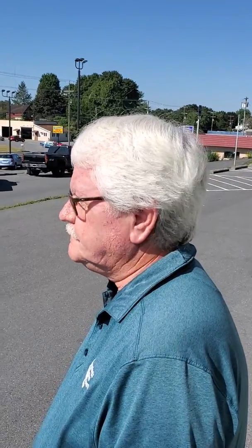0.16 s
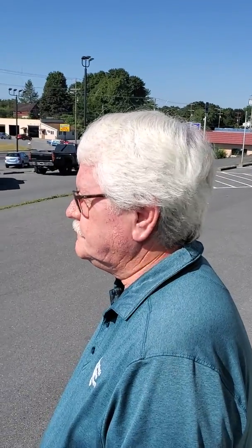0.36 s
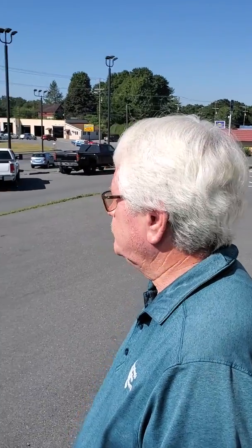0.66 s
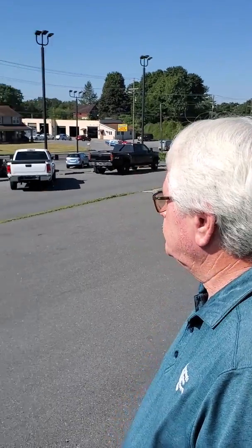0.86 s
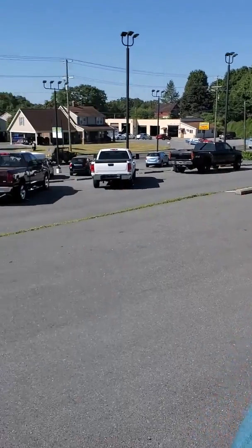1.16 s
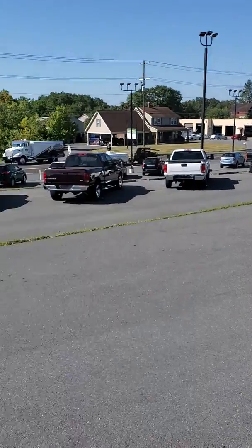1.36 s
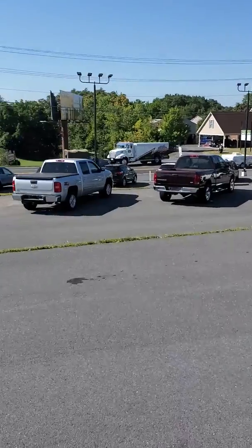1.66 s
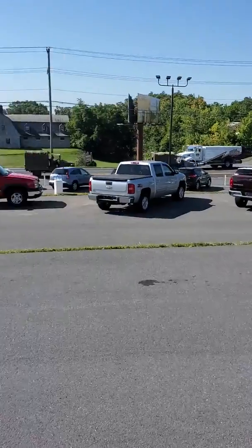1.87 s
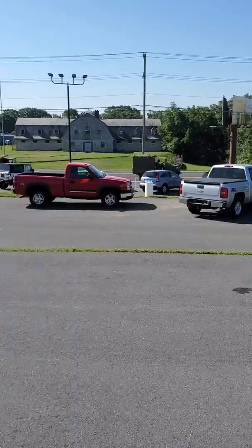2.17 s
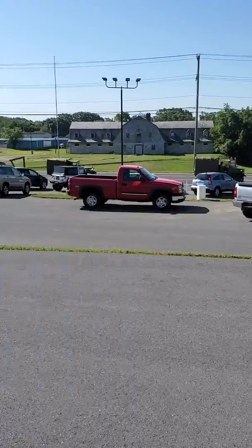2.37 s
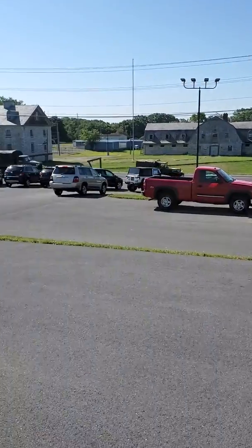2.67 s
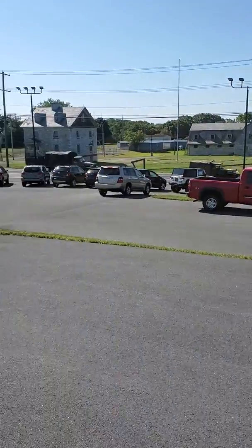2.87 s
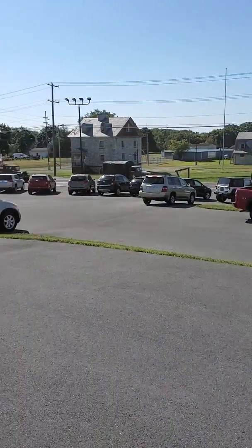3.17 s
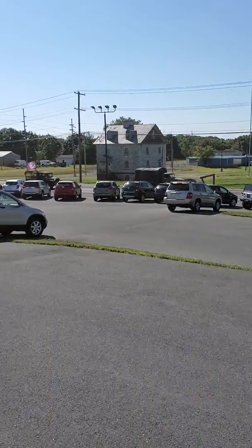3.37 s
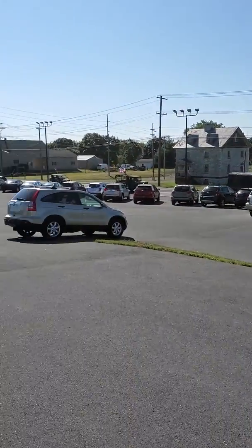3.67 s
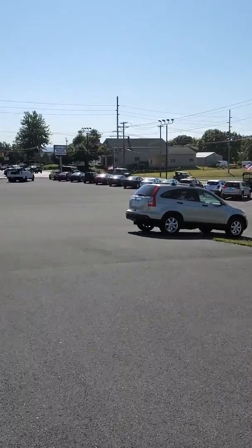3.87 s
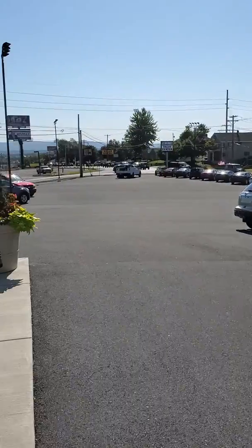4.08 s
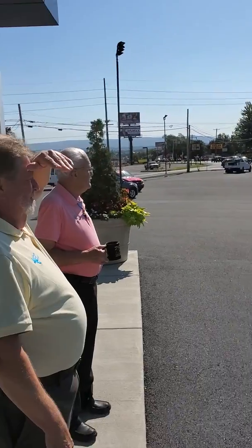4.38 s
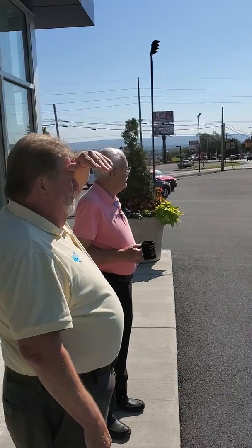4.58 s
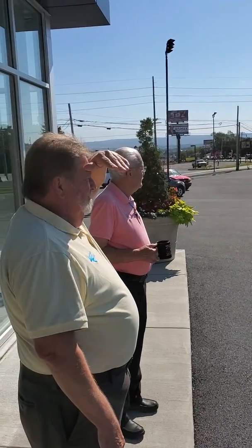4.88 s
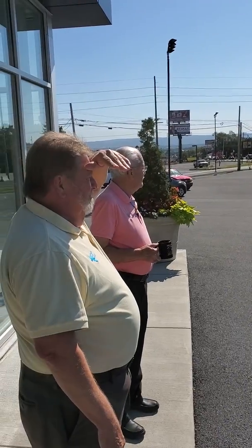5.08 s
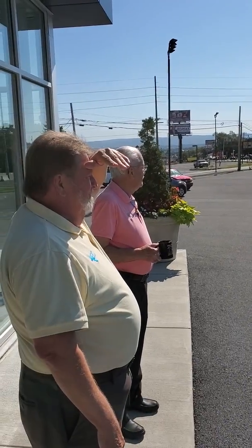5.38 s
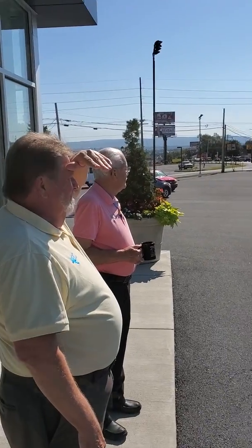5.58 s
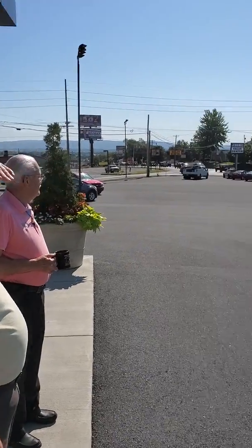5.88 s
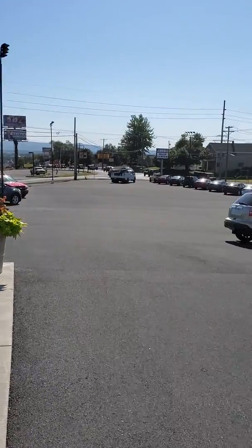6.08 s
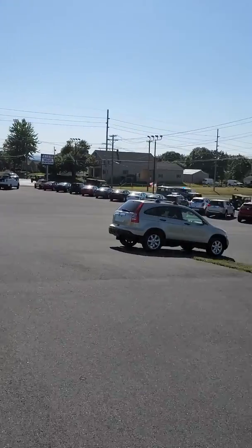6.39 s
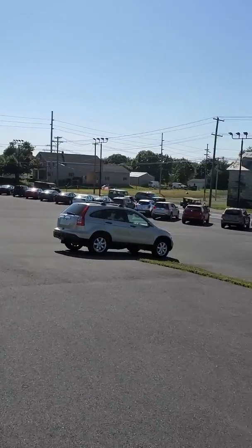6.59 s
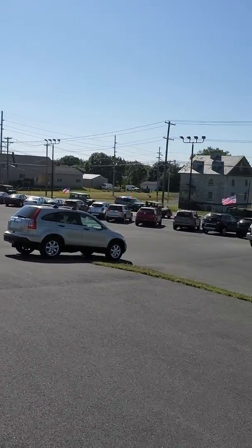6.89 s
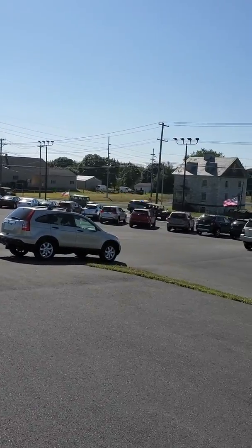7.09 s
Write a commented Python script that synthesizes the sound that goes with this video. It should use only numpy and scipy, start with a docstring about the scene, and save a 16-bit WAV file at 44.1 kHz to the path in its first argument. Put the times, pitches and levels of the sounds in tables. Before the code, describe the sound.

Deep truck exhausts climb in pitch on a nearby road, with one brief air brake hiss and light wind on the microphone.

```python
"""Deep, beating exhaust notes climb as heavy trucks pull up a road beyond a wide car park.
Each exhaust sings its firing note, rising with the revs, over a bed of rumble and tyre roar.
Fans hiss, turbos whistle, loose metal clanks, and one truck vents its air brakes.
It is all heard outdoors through two small microphone ports, with light wind puffing on them."""
import sys
import numpy as np
from scipy import signal
from scipy.io import wavfile
from scipy.ndimage import map_coordinates

SR = 44100
rng = np.random.default_rng(int(sys.argv[2]) if len(sys.argv) > 2 else 0)


def unload_audio(sound):
    """Save the sound as a 16-bit wav file, at the path given as the first command line argument."""
    columns = np.transpose(np.atleast_2d(sound))
    # keep every value between -1 and 1, then stretch to whole-number steps
    steps = np.round(np.clip(columns, -1, 1) * 32767)
    wavfile.write(sys.argv[1], SR, steps.astype(np.int16))


N = 319284
T = np.arange(N) / SR

# Fader rides for the traffic's noise beds: time_s, lows_db, tyres_db, air_db, top_db
TRAFFIC_LEVELS = [(0.0, -40.5, -44.5, -54.5, -65), (0.25, -38.5, -44.5, -57, -72),
                  (0.75, -37.5, -40, -54.5, -60.5), (1.2, -37.5, -43, -55, -58.5),
                  (1.55, -41, -45, -55.5, -62.5), (2.0, -41.5, -46.5, -53.5, -68.5),
                  (2.3, -44, -49, -60, -68.5), (2.75, -40.5, -47.5, -57, -60),
                  (3.0, -42, -45.5, -54.5, -62.5), (3.5, -44, -48, -59.5, -67.5), (4.0, -41, -45, -58, -68),
                  (4.5, -39.5, -45, -55, -70.5), (4.8, -38, -41, -52.5, -65),
                  (5.3, -36.5, -43.5, -55, -63.5), (5.9, -37.5, -43.5, -53.5, -64.5),
                  (6.3, -38.5, -46.5, -53.5, -66.5), (6.75, -41.5, -44.5, -56, -64),
                  (7.24, -39, -45, -54.5, -61)]


def trucks():
    """Seven exhausts spread across the stereo field; neighbouring notes beat."""
    # Each engine's revs and loudness: time_s, firing_hz, level_db
    near = [(0.0, 64.1, -20), (0.3, 67.23, -21), (0.59, 71.9, -21), (0.89, 74.43, -20), (1.1, 76.88, -17),
            (1.33, 80.27, -16.5), (1.48, 83.24, -12.5), (1.7, 85.73, -14), (2.1, 91.8, -11),
            (2.53, 99.8, -11.5), (2.6, 101.3, -13.5), (2.66, 101.9, -21), (2.79, 106, -16.5),
            (3.1, 107.4, -27), (3.28, 98.5, -27), (3.55, 86.5, -34.5), (3.7, 80, -72)]
    leading = [(0.0, 75.5, -22), (0.21, 77.94, -25.5), (0.421, 81.96, -20.5), (0.63, 80.8, -23),
               (0.84, 85.66, -23), (1.06, 85.73, -32), (1.27, 87.6, -19), (1.478, 89.5, -38),
               (1.69, 90.5, -29), (1.901, 91.3, -38)]
    third = [(2.698, 56.4, -62), (2.9, 55.44, -41), (3.488, 59, -38), (4.201, 64.4, -26), (4.55, 66.9, -25),
             (4.66, 68.2, -27), (4.73, 69.2, -30), (4.81, 69.6, -25), (4.88, 70.3, -20), (4.96, 70.4, -36),
             (5.01, 67.8, -18), (5.07, 69.8, -20), (5.14, 69.95, -15), (5.19, 70.8, -28),
             (5.27, 72.63, -23), (5.458, 72.46, -21), (5.9, 75.73, -23), (6.449, 79.65, -28),
             (6.65, 80.1, -29.5), (6.85, 80.5, -24), (7.04, 81.5, -36), (7.24, 83.18, -63)]
    last = [(4.8, 66.9, -50), (5.15, 64.6, -31), (5.32, 64.67, -23), (5.5, 65.6, -29), (5.67, 66.76, -20.5),
            (6.022, 69.34, -18.5), (6.722, 75, -15), (7.071, 77.5, -17.5), (7.24, 79.3, -14)]
    fast = [(3.6, 99.5, -44), (3.9, 101.6, -30.5), (4.4, 105.1, -35.5), (4.7, 108.4, -29),
            (5.11, 111.9, -35.5), (5.32, 113, -27), (5.7, 116.6, -45), (5.97, 116.6, -30.5),
            (6.4, 119.6, -53)]
    far = [(1.4, 71.2, -51), (1.71, 72.23, -41.5), (2.951, 75, -41.5), (3.26, 77.7, -42), (3.88, 77.8, -38),
           (4.5, 78.5, -69)]
    coasting = [(2.498, 97.6, -57), (2.65, 97.17, -30), (2.8, 93.7, -38), (3.05, 97.54, -24),
                (3.2, 100, -69)]
    # Each truck's partials, with fractions from unequal cylinders: ratio to the firing note
    ratios = [(2, 3, 4, 5), (5 / 6,), (2, 7), (5 / 6, 4 / 3, 3, 6), (2,), (), ()]
    # Their balance against the firing note: level_db
    partials_db = [(-27.5, -35, -53, -43), (-28,), (-24, -46), (-25, -19.5, -37, -39), (-22,), (), ()]
    # Each truck's pan: left_minus_right_db
    pans_db = [-0.24, 0.8, -1.5, -0.7, 1.5, -2, 0]
    engines = [near, leading, third, last, fast, far, coasting]
    return sum(exhaust(*truck) * pan(db) for db, *truck in zip(pans_db, engines, ratios, partials_db))


def exhaust(revs, ratios, partials_db):
    """A fluttering firing note whose partials bloom as they sweep through the pipe's resonances."""
    # Exhaust pipe resonances: centre_hz, width_hz, lift_db
    pipe = [(122.3, 8.6, 13.5), (162, 14, 9.5), (193.6, 7.5, 12), (210, 4.7, 7), (244.2, 9, 10),
            (270.4, 12.8, 10.5), (376, 30, 7), (544.8, 27, 14)]
    on = (T >= revs[0][0]) & (T <= revs[-1][0])
    hz, note_db = (curve[on] for curve in curves(revs))
    phase = 2 * np.pi * np.cumsum(hz) / SR
    flutter_db = 0.87 * drift(26)[on]
    flutter_db += 0.13 * np.maximum(-15 - note_db, 0) * drift(6.9)[on]  # shakier below -15 dB
    note = from_db(note_db + flutter_db) * np.cos(phase)
    for ratio, db in zip(ratios, partials_db):
        pipe_db = sum(lift_db * np.exp(-((ratio * hz[::64] - centre_hz) / width_hz) ** 2)
                      for centre_hz, width_hz, lift_db in pipe)
        wander_db = (drift(1.6) + 1.3 * drift(4.6))[on]
        level_db = note_db + db + np.interp(T[on], T[on][::64], pipe_db) + wander_db
        note += from_db(level_db) * np.cos(ratio * phase + 0.06 * drift(3.3)[on])
    out = np.zeros(N)
    out[on] = np.sqrt(2) * note
    return out


def rumble():
    """The traffic's low bed, riding the lows fader with a gentler swing."""
    # Rumble colour: frequency_hz, density_db
    colour = [(25, -19.5), (45, -3.5), (80, 6.5), (130, -2.5), (200, -4.5), (280, -15.5), (400, -28)]
    lows_db = curves(TRAFFIC_LEVELS)[0]
    level_db = -30 + 0.72 * (lows_db - lows_db.mean())
    return from_db(level_db) * banded_noise(colour, flicker_db=0.24)


def growl():
    """The throaty low-mid noise of the exhausts."""
    # Growl colour: frequency_hz, density_db
    colour = [(180, -8.5), (250, -5), (340, 3.5), (420, -3.5), (490, -3.5), (580, -2.5), (750, -6.5),
              (1000, -11)]
    lows_db = curves(TRAFFIC_LEVELS)[0]
    return from_db(lows_db) * banded_noise(colour, flicker_db=0.5)


def tyres():
    """The midrange roar of tyres rolling on the road."""
    # Tyre colour: frequency_hz, density_db
    colour = [(600, -14.5), (850, -3.5), (1100, -2), (1450, -2.5), (1800, -1), (2050, -10.5), (3000, -25.5)]
    tyres_db = curves(TRAFFIC_LEVELS)[1]
    return from_db(tyres_db) * banded_noise(colour, flicker_db=1.15)


def whines():
    """Gears and upper exhaust orders glide evenly as they swell and fade."""
    # Passing whines: start_s, length_s, first_hz, last_hz, peak_db
    glides = [(0.5, 0.6, 436, 456, -50), (0.9, 0.35, 420, 436, -48), (1.05, 0.4, 325, 348, -45),
              (0.75, 0.45, 268, 290, -43), (0.0, 0.3, 190, 186, -38), (1.6, 0.5, 338, 362, -45),
              (3.75, 0.45, 640, 695, -48), (3.95, 0.55, 245, 258, -42), (5.25, 0.5, 845, 870, -50),
              (6.1, 0.5, 725, 760, -51), (6.4, 0.6, 895, 935, -50.5), (6.85, 0.35, 745, 765, -51),
              (1.304, 1.14, 579, 723, -52), (1.85, 0.65, 479.3, 527, -48), (1.999, 0.69, 598, 640, -52),
              (2.501, 0.78, 520, 548, -48), (2.502, 0.46, 605, 638, -51), (3.1, 0.45, 200, 190, -38),
              (3.05, 0.5, 270, 300, -44), (5.251, .7, 222, 227, -41), (5.1, 1.4, 190, 218, -39),
              (3.504, 1.23, 118.3, 128.5, -35.5), (3.86, 0.37, 222, 210.2, -37),
              (4.9, 1.1, 125, 126.6, -32.5), (4.893, 0.55, 420, 432, -44), (5.2, 0.66, 305, 360, -36),
              (4.899, 0.435, 345, 362, -43.5), (5.659, .33, 378, 420, -42), (5.901, .6, 355, 375, -50),
              (6.25, .6, 535, 556, -46), (6.7, .8, 552, 588, -45)]
    out, swell_db = 0, 8
    for start_s, length_s, first_hz, last_hz, peak_db in glides:
        path = [(start_s, first_hz, peak_db - swell_db),
                (start_s + length_s / 2, (first_hz + last_hz) / 2, peak_db),
                (start_s + length_s, last_hz, peak_db - swell_db)]
        out += wavering_tone(path, waver_hz=5.5, stereo_rad=0.3)
    return out


def air_brake():
    """The valve snaps open and holds, then the hiss dies away as the pressure falls."""
    # Colour of the escaping air: frequency_hz, density_db
    colour = [(900, -6), (1300, -3), (1750, 3.5), (2300, -7.5), (3300, 1), (4800, -6), (6700, -1),
              (8200, -9), (12600, -9), (15500, -17)]
    # The lower bands build up later: frequency_hz, extra_attack_s
    slow_attack = [(1200, 0.0055), (2500, 0.014), (3300, 0)]
    # The tail, longest in the upper mids: frequency_hz, t60_s
    tail = [(1300, 0.3), (2000, 0.57), (3500, 0.99), (5000, 0.74), (9000, 0.59), (14000, 0.39)]
    start_s, level_db, attack_s, hold_s = 2.651, -35, 0.006, 0.03

    def envelope(hz):
        rise_s = attack_s + at_hz(slow_attack, hz)
        falling_s = np.maximum(T - start_s - rise_s - hold_s, 0)
        attack = np.clip((T - start_s) / rise_s, 0, 1)
        return attack * from_db(level_db - 60 * falling_s / at_hz(tail, hz))

    return banded_noise(colour, flicker_db=0.5, envelope=envelope)


def clanks():
    """Loose metal chatters briefly on a chassis, ringing the modes near each hit's centre most."""
    # Hits: start_s, level_db, centre_hz
    hits = [(4.764, -45.5, 3680), (4.874, -45, 3900), (4.905, -50, 2900), (4.98, -44.5, 3720),
            (5.09, -49, 4816), (5.16, -51, 2850), (5.2, -48, 3700), (5.218, -46, 2850), (5.305, -50, 4300),
            (5.585, -52, 2850), (5.931, -43.5, 4300), (5.944, -46, 4380)]
    # Chassis modes: pitch_hz, level_db, t60_s
    modes = [(2880, 2, .022), (3564, -2, 0.023), (4000, -4, .018), (4220, -2, 0.026), (4380, 0, 0.031),
             (5270, 6, .018), (6430, 1, .018)]
    chatter_t60_s, spread_hz, off_centre_db = 0.073, 410, -10
    out, age_s = np.zeros((2, N + SR)), T[:SR // 8]
    for start_s, level_db, centre_hz in hits:
        grit = rng.standard_normal(len(age_s)) + rng.standard_normal((2, len(age_s)))  # centre + width
        contact = grit * from_db(-60 * age_s / chatter_t60_s)
        ring = 0
        for hz, mode_db, t60_s in modes:
            focus_db = off_centre_db * (1 - np.exp(-((hz - centre_hz) / spread_hz) ** 2))
            ring += from_db(mode_db + focus_db) * resonate(contact, hz, t60_s)
        attack_rms = np.sqrt(np.mean(ring[:, :SR // 50] ** 2))
        start = round(start_s * SR)
        out[:, start:start + len(age_s)] += from_db(level_db) * ring / attack_rms
    return out[:, :N]


def fans():
    """The bright rush of the fans, with engine clatter tucked under it on the same fader."""
    # Fan colour: frequency_hz, density_db
    colour = [(1500, -14.5), (2100, -2.5), (2800, 1.5), (3250, 0), (3900, -1), (4600, -10.5), (5500, -16)]
    # Fader ride: time_s, level_db
    ride = [(0.0, -49), (0.44, -47.5), (0.98, -46), (1.84, -51), (2.21, -55), (2.57, -54), (2.89, -49),
            (3.41, -54), (4.57, -50.5), (4.81, -47.5), (5.67, -49.5), (5.88, -49), (6.44, -50.5),
            (7.2, -49.5)]
    rush = banded_noise(colour, flicker_db=1.0)
    return from_db(curves(ride)[0]) * (rush + from_db(-5.5) * clatter(knocks_per_s=180))


def clatter(knocks_per_s):
    """Uneven knocks of valves and loose metal ring a few panels, differently at each port; rms 1."""
    # Panel modes: pitch_hz, level_db, t60_s
    modes = [(1520, -7.5, 0.015), (2870, 1.5, 0.016), (3660, 6.5, 0.0082), (4630, -2.5, 0.016),
             (5400, -4.5, 0.013)]
    strength = from_db(4.5 * np.minimum(rng.exponential(1, N), 2.5))
    knocks = strength * (rng.random(N) < knocks_per_s / SR)
    out = 0
    for hz, db, t60_s in modes:
        strikes = knocks * rng.standard_normal((2, N)) + 1e-18
        out += from_db(db) * resonate(strikes, hz, t60_s)
    return unit_rms(out)


def squeaks():
    """Metallic hisses, squeaks and rustles: narrow bands of noise that glide as they swell."""
    # Swells: start_s, length_s, pitch_hz, glide_hz, width_hz, peak_db
    swells = [(.35, .55, 5060, -350, 120, -57), (0.699, 0.87, 4780, -300, 328, -59.5),
              (0.395, 1.24, 1392, 20, 80, -45.5), (0.497, 1.12, 1850, -49.5, 251, -47.5),
              (0.498, 1.03, 2690, -350, 229, -50.5), (0.45, 1.22, 4180, -420, 280, -53),
              (1.101, 0.93, 4600, -250, 331, -59.5), (1.929, 0.048, 5200, 10, 900, -58),
              (2.136, 0.041, 5900, 10, 400, -58), (2.9, 0.025, 5800, 10, 200, -55),
              (2.517, 0.12, 9910, 10, 596, -65), (2.52, .14, 11400, 10, 595, -67),
              (4.5, 1.07, 2800, -39.5, 330, -55), (4.55, 1.3, 3750, -200, 300, -65),
              (4.78, 0.38, 5400, 61, 220, -54), (4.845, 0.28, 6650, -57, 450, -52),
              (4.902, 0.83, 4350, 49.5, 150, -60), (5.601, 0.85, 4440, 100, 498.7, -54),
              (5.68, 0.086, 5130, 60, 400, -51), (5.78, 0.11, 5420, 20, 250, -58),
              (5.92, 0.037, 4230, 51, 349, -50), (5.862, 0.067, 6700, 10, 402, -53),
              (5.978, 0.17, 5350, 10, 450, -56), (6.163, 0.078, 6510, 10, 199.6, -65),
              (6.17, 0.099, 5880, 7, 400, -56), (6.245, 0.098, 4950, 8, 200, -54),
              (6.852, 0.31, 5250, 13, 2513, -50.5)]
    out, white = np.zeros((2, N)), rng.standard_normal((2, N))
    white[1] = 0.6 * white[0] + 0.8 * white[1]  # partly alike at the two ports
    flutter_db = 2.2 * drift(38)
    for start_s, length_s, hz, glide_hz, width_hz, peak_db in swells:
        span = slice(int(start_s * SR), int((start_s + length_s) * SR))
        age_s = T[span] - start_s
        noise = unit_rms(band(white[:, span], hz - width_hz / 2, hz + width_hz / 2))
        glide = np.exp(1j * np.pi * glide_hz * age_s ** 2 / length_s)
        swell = from_db(peak_db + flutter_db[span]) * np.sin(np.pi * age_s / length_s)
        out[:, span] += swell * np.real(signal.hilbert(noise) * glide)
    return out


def turbos():
    """Thin, high whistles that bend as the turbos spool up or down."""
    # One path a whistle: time_s, pitch_hz, level_db
    paths = [
        [(1.2, 6450, -72), (1.45, 6850, -67), (1.62, 7200, -65), (1.79, 7540, -60), (1.87, 7740, -63),
         (1.92, 7900, -69), (1.97, 8040, -66), (2.06, 8270, -70), (2.2, 8560, -78), (2.4, 9000, -84)],
        [(2.75, 10100, -82), (3.0, 10600, -76), (3.12, 10500, -76), (3.22, 9700, -78), (3.45, 8600, -80)],
        [(6.45, 7250, -76), (6.6, 7450, -67), (6.76, 7620, -70), (6.93, 7820, -64), (7.02, 7910, -70),
         (7.1, 8010, -67), (7.24, 8150, -76)],
    ]
    return sum(wavering_tone(path, waver_hz=30, stereo_rad=0.2) for path in paths)


def hiss():
    """The traffic's airy hiss and the fine sizzle on top, both flickering."""
    # Colours of the two layers: frequency_hz, density_db
    air_colour = [(3800, -8.5), (5000, -1), (6700, -2.5), (7400, -9.5), (9000, -22.5)]
    top_colour = [(6000, -13.5), (7800, 1.5), (10300, -4), (11500, -5), (14000, -11.5), (15500, -17)]
    air_db, top_db = curves(TRAFFIC_LEVELS)[2:]
    air = from_db(air_db) * banded_noise(air_colour, flicker_db=1.5)
    return air + from_db(top_db) * banded_noise(top_colour, flicker_db=1.8)


def wind():
    """Wind on the ports: dull thumps over lumpy low buffeting."""
    # Strong puffs: start_s, level_db
    puffs = [(0.761, -26), (0.799, -28), (0.932, -30), (1.008, -25), (1.274, -21), (1.344, -18),
             (1.453, -22), (1.484, -28), (3.955, -29), (4.11, -28), (4.672, -34), (4.806, -33)]
    # Swell of the buffeting: time_s, level_db
    gusts = [(0, -66), (.65, -55), (.8, -38), (1.35, -34), (2.3, -60.5), (3, -41.5), (5.4, -42), (6.2, -54),
             (7.24, -48)]
    pushes = np.full(N, 1e-18)
    for (start_s, db), polarity in zip(puffs, rng.choice([-1, 1], len(puffs))):
        pushes[round(start_s * SR)] = polarity * from_db(db)
    thumps = 210 * band(band(pushes, 45, 150), 30, 210)  # with make-up gain
    buffeting = unit_rms(band(rng.standard_normal((2, N)), 30, 110))
    buffeting *= from_db(curves(gusts)[0] + 0.75 * drift(25))
    return thumps * [[0.75], [-1.25]] + buffeting  # thumps are out of phase, heavier on the right


def wavering_tone(path, waver_hz, stereo_rad):
    """An unsteady sine along a path of time_s, pitch_hz, level_db, offset in phase between the ports."""
    start_s, end_s, fade_s = path[0][0], path[-1][0], 0.092
    on = (T >= start_s) & (T <= end_s)
    hz, level_db = (curve[on] for curve in curves(path))
    phase = 2 * np.pi * np.cumsum(hz + waver_hz * drift(30)[on]) / SR
    fade = np.clip(np.minimum(T[on] - start_s, end_s - T[on]) / fade_s, 0, 1)
    gain = fade * from_db(level_db + 3.07 * drift(22)[on])
    out = np.zeros((2, N))
    out[:, on] = np.sqrt(2) * gain * np.sin(phase + [[0], [stereo_rad]])
    return out


def banded_noise(colour, flicker_db, envelope=lambda hz: 1):
    """Stereo noise in flickering third-octave bands; its mono mix has rms 1 before the envelope."""
    # The image widens towards the treble: frequency_hz, left_right_correlation
    likeness = [(30, 0.85), (60, 0.83), (130, 1), (260, 0.92), (550, 0.83), (1100, 0.67), (1800, 0.7),
                (2600, 0.42), (4000, 0.48), (6400, 0.45), (9000, 0.3), (15000, 0.25)]
    # Tonal imbalance of the ports: frequency_hz, left_minus_right_db
    balance = [(60, 1.5), (250, -1.5), (500, 0.5), (1000, -0.5), (1800, -3.5), (2600, 3.5), (3600, 0),
               (4800, 4.5), (6400, 4.5), (8300, -5), (12000, 1.5)]
    # The left port leads near a resonance of the case: frequency_hz, lead_samples
    left_lead = [(900, 0), (1300, 1), (1700, 4), (2050, 3), (2300, 0)]
    edges_hz = 22 * 2 ** np.arange(0, 9.7, 1 / 3)
    out, power, shared_flicker = 0, 0, 0.57 * drift(32)
    white = rng.standard_normal((2, 2, N))
    for k, (low_hz, high_hz) in enumerate(zip(edges_hz, edges_hz[1:])):
        hz = np.sqrt(low_hz * high_hz)
        if not colour[0][0] < hz < colour[-1][0]:
            continue
        mid, side = band(white[k % 2], low_hz, high_hz)  # neighbouring bands get unrelated noise
        alike = at_hz(likeness, hz)
        stereo = np.sqrt(1 + alike) * mid + np.sqrt(1 - alike) * side * [[1], [-1]]
        gain = from_db(at_hz(colour, hz) + flicker_db * (shared_flicker + drift(8.5)))
        noise = gain * pan(at_hz(balance, hz)) * stereo
        noise[0] = np.roll(noise[0], -round(at_hz(left_lead, hz)))
        out += noise * envelope(hz)
        power += np.mean(noise.mean(axis=0) ** 2)
    return out / np.sqrt(power)


def resonate(x, hz, t60_s):
    """One ringing mode, driven by x."""
    decay, angle = from_db(-60 / (t60_s * SR)), 2 * np.pi * hz / SR
    return signal.lfilter([0, np.sin(angle)], [1, -2 * decay * np.cos(angle), decay ** 2], x)


def drift(rate_hz):
    """Smooth random modulation, rms 1."""
    hop, settle = 40, 2000
    pole = np.exp(-2 * np.pi * rate_hz * hop / SR)
    white = rng.standard_normal(N // hop + settle + 2)
    slow = signal.lfilter([1], [1, -2 * pole, pole ** 2], white)[settle:]
    return np.interp(np.arange(N) / hop, np.arange(len(slow)), unit_rms(slow))


def band(x, low_hz, high_hz):
    """Band-pass filter."""
    edges_hz = [low_hz, min(high_hz, 0.45 * SR)]
    return signal.sosfilt(signal.butter(2, edges_hz, "band", fs=SR, output="sos"), x)


def curves(rows):
    """One automation curve for each column after time_s."""
    time_s, *columns = np.transpose(rows)
    return [np.interp(T, time_s, column) for column in columns]


def at_hz(points, hz):
    """A curve read on a log-frequency axis."""
    frequency_hz, values = np.transpose(points)
    return np.interp(np.log(hz), np.log(frequency_hz), values)


def pan(left_minus_right_db):
    """Left and right gains."""
    return from_db(np.array([[0.5], [-0.5]]) * left_minus_right_db)


def from_db(db):
    """Gain of a level."""
    return 10 ** (np.asarray(db) / 20)


def unit_rms(x):
    """Scaled to rms 1."""
    return x / np.sqrt(np.mean(x ** 2) + 1e-20)


def scene():
    """The body of the traffic holds its place while the treble swings as the microphone turns."""
    # The microphone's turn: time_s, left_lag_samples, left_minus_right_db
    turn = [(0, 4.5, -0.5), (.6, 5.5, -0.5), (1.05, 6, -0.7), (1.22, -2.5, 0), (2.2, -1, 0.5), (3, -0.5, 0),
            (4.1, 1.3, -0.3), (4.7, 3.5, -0.4), (5.4, 2.5, -0.4), (7.24, 0.5, 0.2)]
    lag_samples, pan_db = curves(turn)
    body = rumble() + trucks() + whines() + growl() + tyres()
    treble = fans() + hiss() + air_brake() + turbos() + squeaks() + clanks()
    treble[0] = map_coordinates(treble[0], [np.arange(N) - lag_samples], order=3, mode="nearest")
    return (body + treble) * pan(pan_db) + wind()


def record(dry):
    """A quick fade-in, the microphone's low cut and hollows, then a steep cut of the very top."""
    # Hollows in the microphone's colour: centre_hz, width_hz, gain_db
    dips = [(2090, 250, -3), (3150, 320, -2.5), (5340, 750, -1), (8150, 1600, -3)]
    fade_s, low_cut_hz, high_cut_hz = 0.0015, 29, 15850
    x = dry * np.clip(T / fade_s, 0, 1)
    x = signal.sosfilt(signal.butter(2, low_cut_hz, "high", fs=SR, output="sos"), x)
    for hz, width_hz, db in dips:
        x += (from_db(db) - 1) * signal.lfilter(*signal.iirpeak(hz, hz / width_hz, fs=SR), x)
    return signal.sosfilt(signal.cheby2(20, 70, high_cut_hz, fs=SR, output="sos"), x)


dry = scene()
out = record(dry)
unload_audio(out)
```